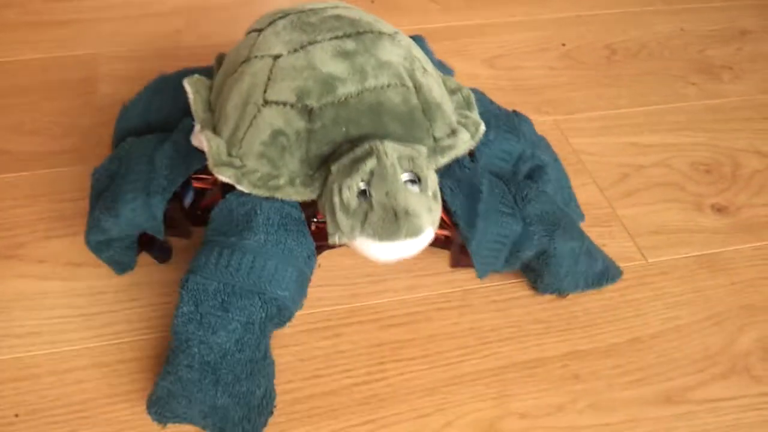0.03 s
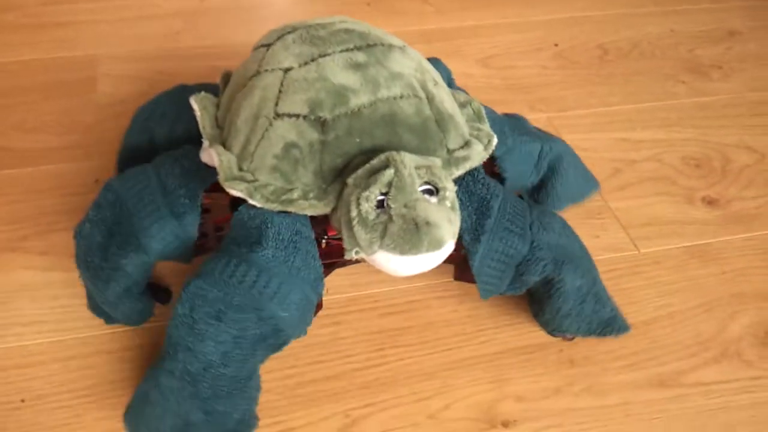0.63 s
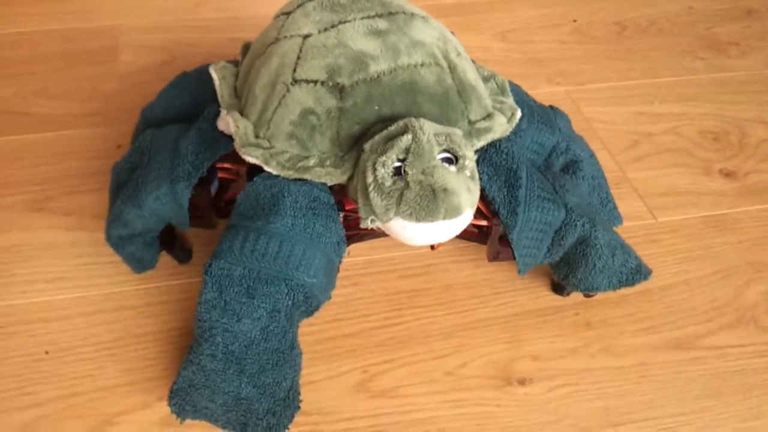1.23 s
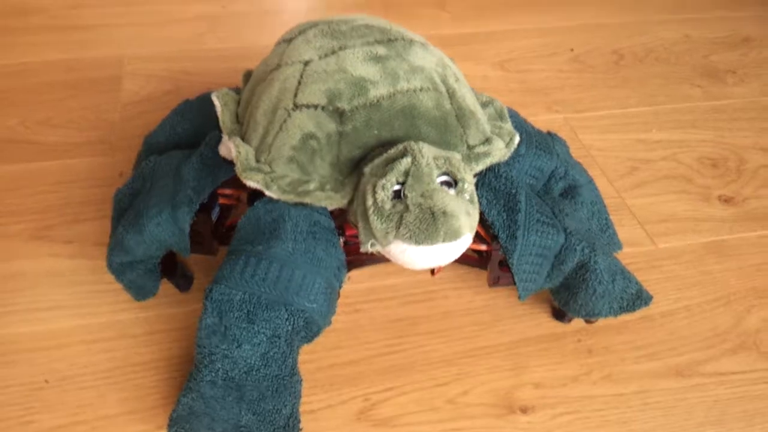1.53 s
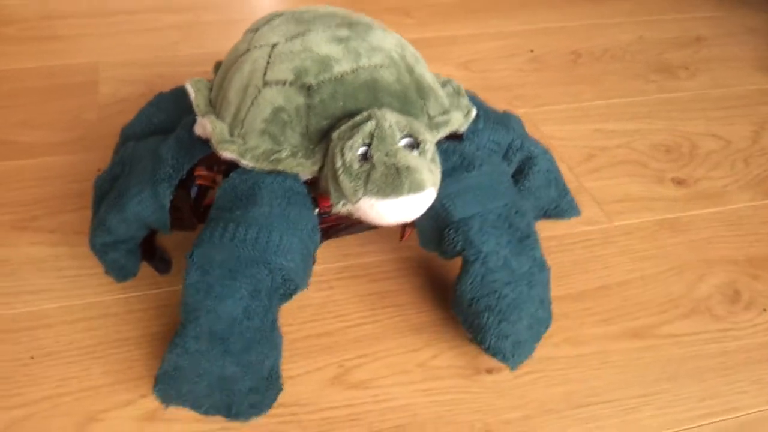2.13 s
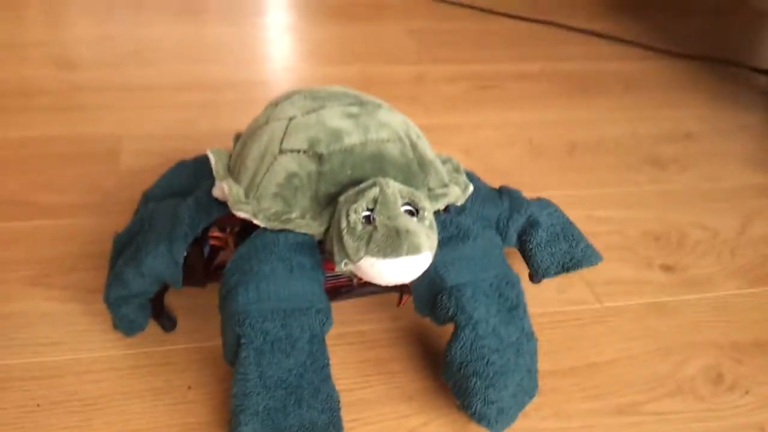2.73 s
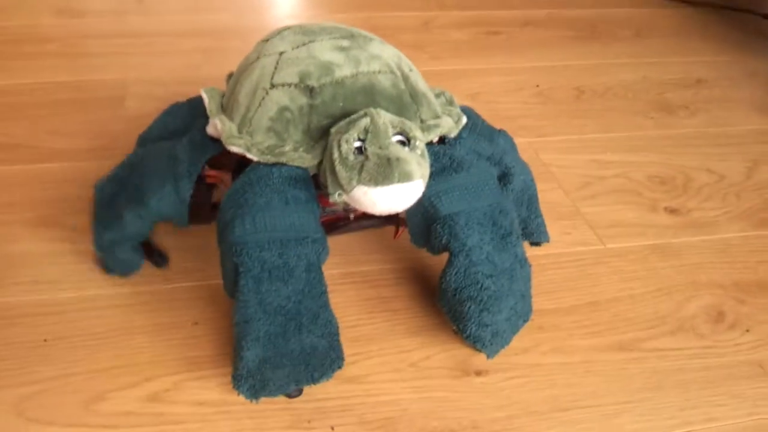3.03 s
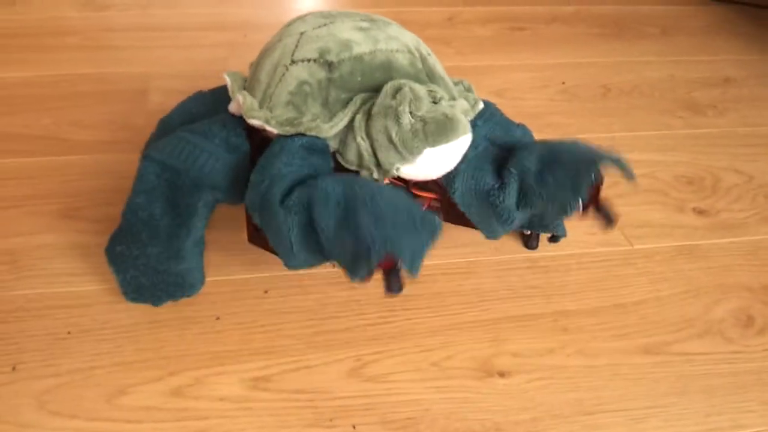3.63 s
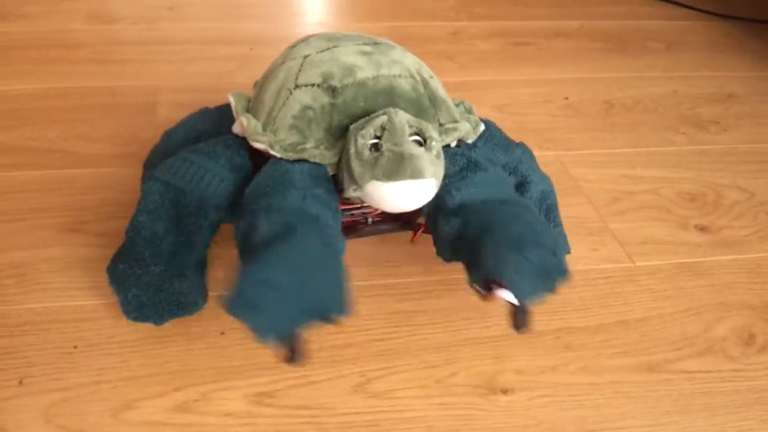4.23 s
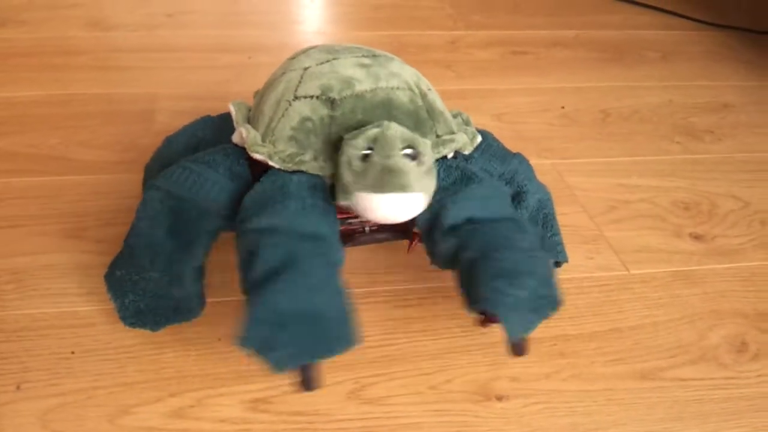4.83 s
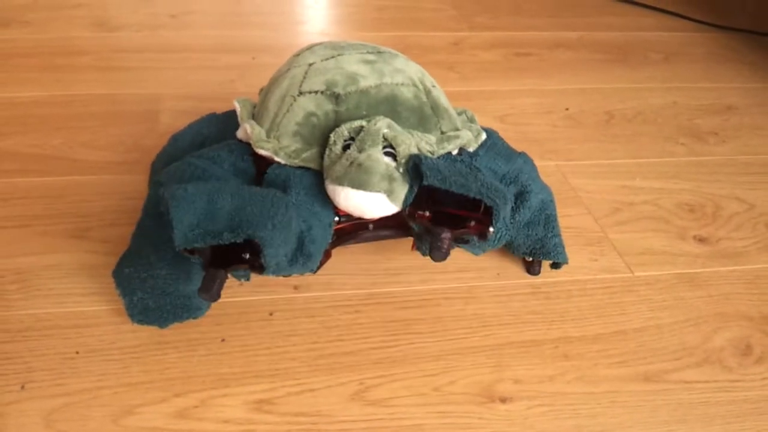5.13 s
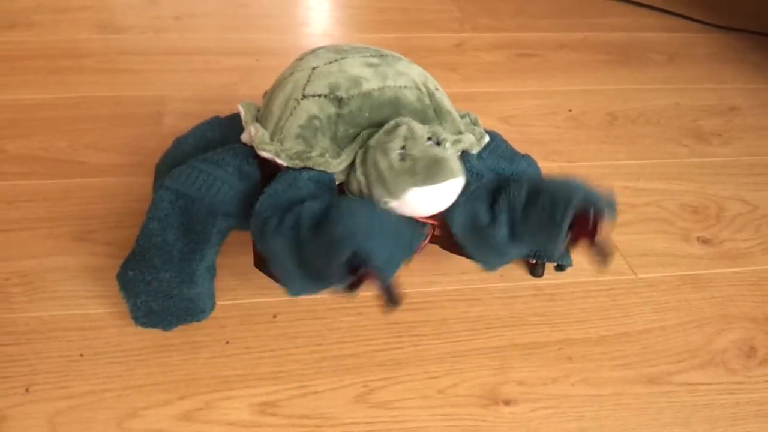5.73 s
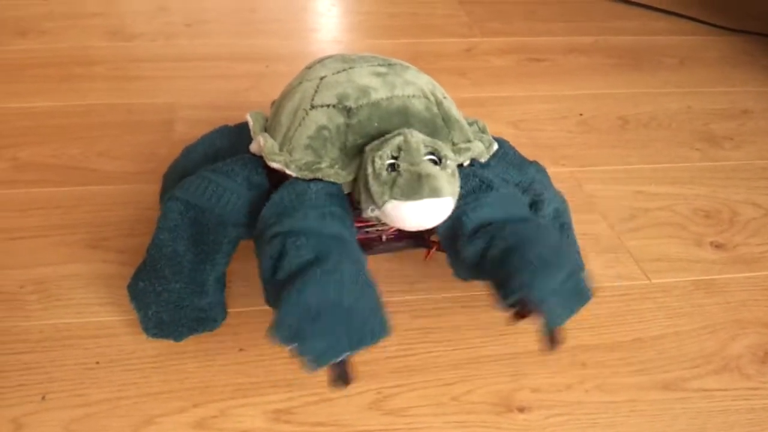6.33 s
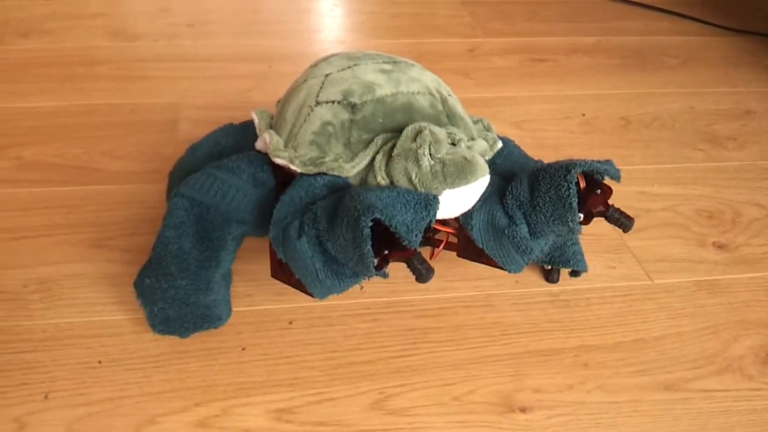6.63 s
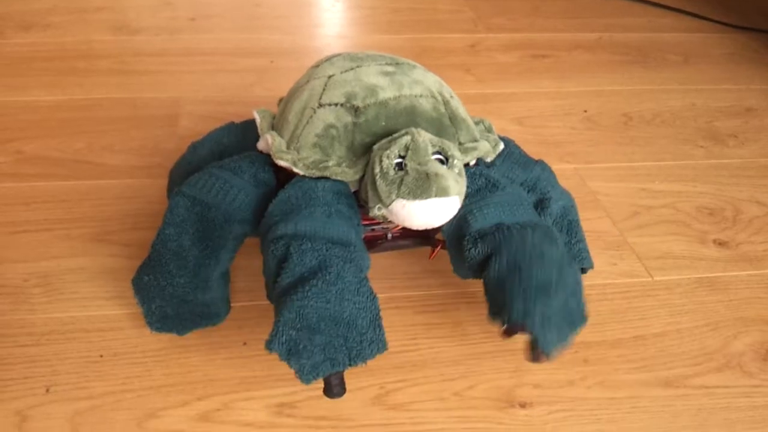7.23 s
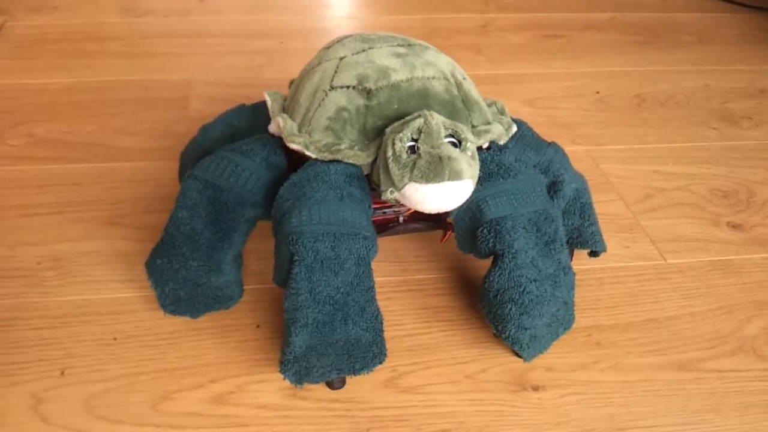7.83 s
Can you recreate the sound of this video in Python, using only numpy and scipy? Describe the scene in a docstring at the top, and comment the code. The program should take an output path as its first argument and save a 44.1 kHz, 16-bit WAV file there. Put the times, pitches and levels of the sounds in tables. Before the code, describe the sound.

A small walking robot moves its legs on a wooden floor, close to the microphone in a small room. Its geared motors whir and rasp in quick, high bursts with tiny squeals. After a brief lull with only a faint electric buzz, the bursts resume and become longer, regular sweeps. Padded feet thump softly now and then, and a light clack comes near the end.

```python
"""Small four-legged robot on a wooden floor.

It steps and waves its legs in a plush cover, close by, in a small room. Its geared servos
whirr, rasp and squeal in bursts, jerk as they take up load, and buzz at their control rate.
Padded feet thump, leg joints thud faintly, a bare tip clacks, and mains hum lies underneath."""
import sys
import numpy as np
from scipy import signal
from scipy.fft import rfft, irfft, next_fast_len
from scipy.io import wavfile

SR = 44100
rng = np.random.default_rng(int(sys.argv[2]) if len(sys.argv) > 2 else 0)


def bounce(signal):
    """Save signal as a 16-bit WAV file at the path given by the first command-line argument."""
    frames = np.transpose(np.atleast_2d(signal))
    limited = np.clip(frames, -1, 1)
    pcm = np.round(limited * 32767).astype(np.int16)
    wavfile.write(sys.argv[1], SR, pcm)


N = 351918
TIME_S = np.arange(N) / SR
CONTROL_HZ, CUTOFF_HZ = 50, 15600

# Servo strokes, one per leg movement. Each row: start, spin-up and hold in seconds, braking in
# seconds per 20 dB, gear level in dB, rasp and growl in dB relative to it, frame shudder in dB.
SERVO_STROKES = [(-0.03, 0.03, 0.209, 0.25, -33.0, -13.0, -24.0, -59.5),
                 (0.264, 0.028, 0.035, 0.118, -35.0, -14.5, -26.5, -72.0),
                 (0.34, 0.036, 0.097, 0.12, -31.5, -14.0, -24.5, -59.0),
                 (0.499, 0.037, 0.057, 0.234, -31.0, -13.0, -27.0, -68.0),
                 (0.634, 0.017, 0.158, 0.177, -34.0, -11.5, -24.0, -66.0),
                 (0.814, 0.033, 0.022, 0.146, -32.0, -11.0, -24.5, -60.5),
                 (0.916, 0.019, 0.055, 0.075, -40.0, -15.0, -26.0, -59.0),
                 (1.768, 0.06, 0.099, 0.04, -31.0, -10.5, -29.5, -70.5),
                 (1.939, 0.042, 0.089, 0.052, -34.5, -12.0, -25.0, -71.5),
                 (2.078, 0.01, 0.01, 0.245, -30.5, -14.0, -27.5, -63.5),
                 (2.216, 0.048, 0.111, 0.067, -34.5, -10.0, -30.0, -74.0),
                 (2.4, 0.075, 0.071, 0.061, -33.0, -9.5, -26.0, -68.0),
                 (2.575, 0.08, 0.071, 0.062, -35.5, -14.5, -24.0, -76.0),
                 (2.764, 0.043, 0.112, 0.087, -35.5, -12.0, -24.0, -74.0),
                 (2.991, 0.108, 0.023, 0.122, -33.0, -11.5, -19.5, -65.0),
                 (3.138, 0.088, 0.092, 0.118, -33.5, -14.0, -23.5, -63.5),
                 (3.391, 0.103, 0.153, 0.16, -28.5, -10.5, -25.0, -69.5),
                 (3.691, 0.01, 0.066, 0.059, -34.5, -14.0, -32.5, -67.0),
                 (3.897, 0.226, 0.01, 0.146, -29.0, -9.0, -23.5, -64.5),
                 (4.199, 0.092, 0.125, 0.079, -29.5, -12.0, -26.0, -72.0),
                 (4.596, 0.221, 0.016, 0.25, -31.5, -9.0, -21.0, -62.5),
                 (4.896, 0.126, 0.096, 0.074, -29.0, -11.0, -25.0, -70.0),
                 (5.292, 0.221, 0.022, 0.143, -30.5, -9.0, -20.5, -65.0),
                 (5.589, 0.105, 0.131, 0.07, -30.5, -10.5, -26.0, -71.5),
                 (6.026, 0.19, 0.04, 0.125, -29.5, -10.0, -23.0, -62.5),
                 (6.315, 0.1, 0.125, 0.088, -30.0, -11.0, -25.0, -71.0),
                 (6.74, 0.2, 0.045, 0.085, -28.5, -10.0, -23.0, -60.0),
                 (7.224, 0.04, 0.124, 0.225, -33.5, -10.5, -25.5, -65.5),
                 (7.401, 0.139, 0.149, 0.065, -32.5, -8.5, -25.5, -66.0)]
# Gear whine partials. Each row: multiple of the mesh rate, relative level in dB.
MESH_PARTIALS = [(1, -7), (5 / 3, -3), (2, -1), (7 / 3, -1), (3, -1), (11 / 3, -2), (13 / 3, -1), (5, -1)]
# Gear case response. Each row: frequency in Hz, relative gain in dB.
GEAR_CASE_SPECTRUM = [(700, -51), (1200, -19), (2000, -24), (2600, -20), (3300, -12.5), (4000, -7),
                      (5000, -0.5), (6200, 3.5), (7200, 0), (8500, -6.5), (10400, -12), (13000, -12.5),
                      (15500, -15.5)]
# One gear singing out. Each row: start and length in seconds, start and end pitch in Hz, level in dB.
GEAR_SQUEALS = [(0.420, .050, 4000, 3720, -45), (0.542, .045, 6000, 5850, -35),
                (0.573, .020, 5150, 5100, -37), (1.835, .045, 6300, 7600, -38),
                (1.895, .040, 4150, 4500, -42), (2.088, .016, 7300, 6900, -31),
                (2.106, .014, 7300, 6300, -31), (2.130, .014, 6200, 5650, -30),
                (2.280, .040, 5100, 5230, -38), (2.660, .035, 4280, 4380, -43),
                (3.065, .090, 5450, 5520, -41), (3.295, .045, 8900, 6600, -38),
                (3.437, .026, 6250, 6600, -31), (3.480, .060, 4950, 5100, -38),
                (3.480, .200, 2100, 3100, -57), (3.570, .045, 5800, 6250, -32),
                (3.662, .018, 6200, 5700, -31), (4.295, .130, 6480, 6540, -41),
                (4.780, .085, 4000, 5050, -39), (5.465, .065, 4150, 5150, -39),
                (6.205, .045, 6400, 5750, -35), (6.480, .045, 7100, 7200, -38),
                (7.605, .025, 6150, 6250, -34)]
# Gears taking up slack. Each row: start in seconds, relative level in dB.
GEAR_JERKS = [(0.367, -19.5), (0.423, -21), (0.851, -22.5), (1.132, -44), (1.340, -50), (1.789, -33),
              (1.984, -25), (2.089, -30), (3.024, -24), (3.288, -17), (3.441, -27), (3.899, -36.5),
              (4.046, -21.5), (4.617, -33.5), (4.686, -32), (4.711, -24), (5.336, -29.5), (6.054, -30),
              (6.084, -23), (6.805, -22), (7.109, -42), (7.241, -27), (7.328, -22.5)]
# Colour of the holding buzz. Each row: frequency in Hz, relative gain in dB.
BUZZ_SPECTRUM = [(1500, -12), (2500, -14), (3000, -5), (3400, -6.5), (4150, -1), (5200, -1.5), (6000, 2),
                 (7000, -5), (8300, -5.5), (10000, -25), (15500, -66)]
# Low thuds: padded feet landing, and faint leg-joint thuds during swings.
# Each row: start in seconds, relative level in dB.
LOW_THUDS = [(0.052, -44), (0.384, -51.5), (0.452, -43.5), (0.494, -55), (0.887, -46), (0.954, -56),
             (2.084, -48.5), (2.533, -53.5), (2.898, -35), (3.06, -49), (3.285, -27.5), (3.319, -47),
             (4.696, -52.5), (5.38, -53), (6.097, -53), (6.289, -55), (6.821, -52), (7.008, -51)]
# Floorboard modes. Each row: frequency in Hz, gain in dB, 60 dB decay time in seconds.
BOARD_MODES = [(174, -9.5, 0.061), (229, -3, 0.1), (274.5, 2, 0.063), (402, -10, 0.045), (474, -20, 0.17),
               (538, -18.5, 0.11), (680, -14, 0.021)]
# Bare tip hitting the boards. Each row: start in seconds, relative level in dB.
TIP_CLACKS = [(0.028, -50.5), (0.384, -54), (0.452, -50), (0.851, -48.5), (1.341, -65), (3.287, -48),
              (7.194, -37), (7.335, -53.5)]
# Colour of a clack. Each row: frequency in Hz, relative gain in dB.
CLACK_SPECTRUM = [(60, -28), (150, -10), (300, -2), (600, 0), (1400, 0), (2500, -3), (4000, -6),
                  (7000, -13), (15000, -28)]
# Colour of the room rumble. Each row: frequency in Hz, relative gain in dB.
RUMBLE_SPECTRUM = [(20, -6), (75, 0), (125, -2.5), (180, -2), (450, -5.5), (1000, -7.5), (2500, -14.5),
                   (5000, -33)]
# Mains hum partials. Each row: frequency in Hz, rms level in dB.
HUM_PARTIALS = [(100, -70.5), (150, -74.5), (300, -83)]


def gear_train(speed, mesh_hz, wander=.035, flutter=.012, rattle_spread_db=2.5, flicker_db=9.0):
    """Teeth click and whine at the mesh rate, pushed once per control pulse."""
    tooth_hz = mesh_hz * speed * np.exp(wander * drift(22) + flutter * drift(320))
    teeth = np.cumsum(tooth_hz) / SR
    whine = np.zeros(N)
    for multiple, db in MESH_PARTIALS:
        flare = from_db(db + flicker_db * np.tanh(drift(130)))  # shifting tooth contact
        tone = np.sin(2 * np.pi * (multiple * teeth + rng.random()))
        whine += flare * tone * (multiple * tooth_hz < CUTOFF_HZ)
    contacts = np.diff(np.floor(teeth), prepend=0)
    impacts = contacts * rng.uniform(-0.88, 1, N) / np.sqrt(speed)
    rattle = unit_rms(impacts * from_db(rattle_spread_db * drift(450)))  # slack gears knock in clumps
    throb_db = np.cos(2 * np.pi * (CONTROL_HZ * TIME_S + rng.random()))
    return (rattle + from_db(-4.5) * speed * unit_rms(whine)) * from_db(throb_db)


def gear_whirr(level_db, rasp_db, growl_db, joints=4):
    """Several gear trains share the work; harder drive spins them up, lagged by inertia."""
    target_speed = np.clip(from_db(.17 * (level_db + 30)), .5, 1.15)
    speed = lag(target_speed, tau_s=.06)
    shares = [from_db(4.3 * drift(14)) for _ in range(joints)]
    trains = [gear_train(speed, mesh_hz) for mesh_hz in np.geomspace(2400, 3300, joints)]
    mix = sum(share * train for share, train in zip(shares, trains))
    mix /= np.sqrt(sum(share ** 2 for share in shares))
    case = colour(mix, GEAR_CASE_SPECTRUM)
    # a labouring train loses its rasp and rings the case's main resonance instead
    ringing = from_db(-6.0 - 1.47 * np.maximum(rasp_db + 19.0, -8))
    resonance = unit_rms(butter(case, [5650, 7000], "band"))
    broad = unit_rms(butter(case, [3800, 9800], "band", order=4))
    body_rms = np.sqrt(1 + ringing ** 2 + 2 * ringing * np.mean(broad * resonance))
    body = (broad + ringing * resonance) / body_rms
    rasp = unit_rms(butter(case, 10220, "high", order=5)) * from_db(rasp_db + 2.04 + 1.46 * drift(24))
    growl = unit_rms(butter(case, [1750, 3150], "band")) * from_db(growl_db + 7.0)
    return from_db(level_db - 0.5) * (body + rasp + growl)


def stroke_drive(start_s, spin_up_s, hold_s, braking_s, settle_db=-18.0, settle_db_per_s=48.0):
    """Motor drive, 0-1: ramps up, holds, brakes, then fades as the servo settles."""
    late_s = np.maximum(TIME_S - start_s - spin_up_s - hold_s, 0)
    release_db = np.maximum(-20 * late_s / braking_s, settle_db - settle_db_per_s * late_s)
    return np.clip((TIME_S - start_s) / spin_up_s, 0, 1) * from_db(release_db)


def leg_levels_db():
    """Overlapping strokes add in power. Gives gear level, relative rasp, relative growl, shudder."""
    power = np.full((4, N), 1e-12)
    for *timing_s, level_db, rasp_db, growl_db, shudder_db in SERVO_STROKES:
        drive = stroke_drive(*timing_s)
        power[0] += (from_db(level_db) * drive) ** 2
        power[1] += (from_db(level_db + rasp_db) * drive ** 1.34) ** 2  # rasp needs full drive
        power[2] += (from_db(level_db + growl_db) * drive ** 0.87) ** 2
        power[3] += (from_db(shudder_db) * drive ** 0.69) ** 2  # shudders from the first push
    level_db, rasp_db, growl_db, shudder_db = 10 * np.log10(power)
    return level_db, rasp_db - level_db, growl_db - level_db, shudder_db


def gear_squeals(flutter_hz=90, flicker_db=3.0):
    """A loaded gear slips into a short gliding note, unsteady in pitch and strength."""
    out = np.zeros(N)
    detune_hz = flutter_hz * drift(600)
    for start_s, length_s, start_hz, end_hz, db in GEAR_SQUEALS:
        span = slice(int(start_s * SR), int((start_s + length_s) * SR))
        hz = np.linspace(start_hz, end_hz, len(out[span])) + detune_hz[span]
        envelope = from_db(db) * np.sqrt(2) * signal.windows.tukey(len(hz))
        out[span] += envelope * np.sin(2 * np.pi * np.cumsum(hz) / SR)
    return out * from_db(flicker_db * drift(250))


def gear_jerks():
    """A short chatter of teeth rings the gear case near its main resonance."""
    envelope = lag(decay(clicks(GEAR_JERKS), t60_s=0.065), tau_s=0.001)
    chatter = colour(rng.standard_normal(N) * envelope, GEAR_CASE_SPECTRUM)
    return from_db(-5.5) * butter(chatter, [5000, 8500], "band", order=1)


def holding_buzz(servos=5, kick_s=.006):
    """Servos holding position get a short kick on every control pulse; runs throughout."""
    period = SR // CONTROL_HZ
    ages = [(np.arange(period) - rng.integers(period)) % period for _ in range(servos)]
    gate = sum(np.exp(-age / (kick_s * SR)) for age in ages)
    repeating = np.resize(rng.standard_normal(period), N)
    kicks = np.resize(gate, N) * (repeating + rng.standard_normal(N))
    return unit_rms(colour(kicks, BUZZ_SPECTRUM)) * from_db(-59.0 + drift(25))


def frame_shudder(level_db):
    """Uneven motor torque shakes the leg frame at its low resonance."""
    shudder = butter(rng.standard_normal(N), [226, 316], "band", order=3)
    return from_db(level_db + 0.6) * unit_rms(shudder)


def low_thuds():
    """Padded footfalls and faint leg-joint thuds softly ring the board modes."""
    pushes = clicks(LOW_THUDS)
    boards = sum((-1) ** k * from_db(db) * ring(pushes, hz, t60_s)
                 for k, (hz, db, t60_s) in enumerate(BOARD_MODES))
    muffled = butter(boards, 840, "low")
    return from_db(3.5) * butter(muffled, 126, "high", order=3)


def tip_clacks():
    """A bare tip hits the boards: a sharp noise burst with a weaker, longer tail."""
    knocks = clicks(TIP_CLACKS)
    envelope = decay(knocks, t60_s=0.086) + from_db(-6.0) * decay(knocks, t60_s=0.64)
    return from_db(-5.5) * colour(rng.standard_normal(N) * envelope, CLACK_SPECTRUM)


def room(x, t60_s, wet_db, gap_s=.004):
    """Direct sound plus dense, decaying reflections from floor and walls."""
    delay_s = TIME_S[:SR // 2]
    tail = rng.standard_normal(len(delay_s)) * from_db(-60 * delay_s / t60_s) * (delay_s > gap_s)
    return x + from_db(wet_db) * signal.fftconvolve(x, tail / np.linalg.norm(tail))[:N]


def background():
    """Room rumble, microphone hiss and mains hum."""
    rumble = from_db(-67.0) * unit_rms(colour(rng.standard_normal(N), RUMBLE_SPECTRUM))
    hiss = from_db(-65.5) * rng.standard_normal(N)
    hum = sum(from_db(db) * np.sqrt(2) * np.sin(2 * np.pi * (hz * TIME_S + rng.random()))
              for hz, db in HUM_PARTIALS)
    return rumble + hiss + hum


def from_db(db):
    """Decibels to gain."""
    return 10 ** (np.asarray(db) / 20)


def unit_rms(x):
    """Scale to unit rms."""
    return x / np.sqrt(np.mean(x ** 2) + 1e-20)


def drift(knots_per_s):
    """Random wander of unit rms."""
    knots = rng.standard_normal(8192)
    return unit_rms(np.interp(TIME_S * knots_per_s, np.arange(len(knots)), knots))


def lag(x, tau_s):
    """One-pole inertia."""
    pole = np.exp(-1 / (tau_s * SR))
    return signal.lfilter([1 - pole], [1, -pole], x, zi=[pole * x[0]])[0]


def butter(x, hz, kind, order=2):
    """Butterworth filter."""
    return signal.sosfilt(signal.butter(order, hz, kind, fs=SR, output="sos"), x)


def colour(x, spectrum):
    """Minimum-phase filter with the given spectrum; white noise keeps its level."""
    size = 2 * next_fast_len(N // 2 + 8192)
    hz, db = np.transpose(spectrum)
    bins_hz = np.fft.rfftfreq(size, 1 / SR)
    gain = unit_rms(from_db(np.interp(np.log(bins_hz + 1), np.log(hz), db)))
    cepstrum = irfft(np.log(gain))
    cepstrum[1:size // 2] *= 2
    cepstrum[size // 2 + 1:] = 0
    return irfft(rfft(x, size) * np.exp(rfft(cepstrum)))[:N]


def ring(x, hz, t60_s):
    """Resonator: a unit click starts a decaying sine of height 1."""
    radius, angle_rad = from_db(-60 / (t60_s * SR)), 2 * np.pi * hz / SR
    feedback = [1, -2 * radius * np.cos(angle_rad), radius ** 2]
    return signal.lfilter([0, np.sin(angle_rad)], feedback, x + 1e-18)


def clicks(events):
    """One impulse per event."""
    start_s, db = np.transpose(events)
    out = np.zeros(N)
    out[np.round(start_s * SR).astype(int)] = from_db(db)
    return out


def decay(x, t60_s):
    """Each click becomes a decaying envelope of the same height."""
    return signal.lfilter([1], [1, -from_db(-60 / (t60_s * SR))], x + 1e-18)


def scene():
    """Servos, thuds and clacks in the room, over the background; both channels alike."""
    level_db, rasp_db, growl_db, shudder_db = leg_levels_db()
    gears = gear_whirr(level_db, rasp_db, growl_db) + gear_squeals() + gear_jerks()
    servos = room(gears + holding_buzz() + frame_shudder(shudder_db), t60_s=0.21, wet_db=-13.5)
    impacts = room(low_thuds() + tip_clacks(), t60_s=.22, wet_db=-11.0)
    mono = servos + impacts + background()
    return np.array([mono, mono])


def record(dry):
    """Steep elliptic low-pass."""
    return signal.sosfilt(signal.ellip(12, .1, 80, CUTOFF_HZ, fs=SR, output="sos"), dry)


dry = scene()
out = record(dry)
bounce(out)
```